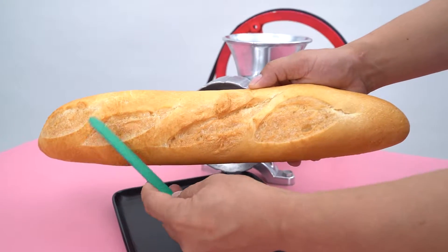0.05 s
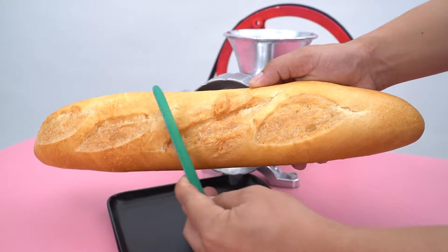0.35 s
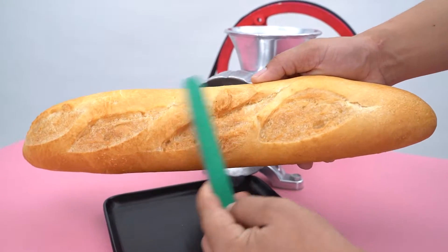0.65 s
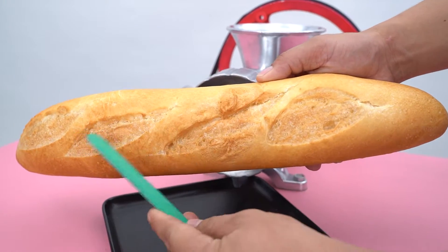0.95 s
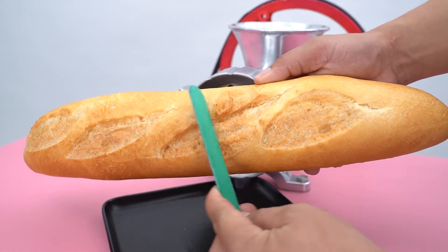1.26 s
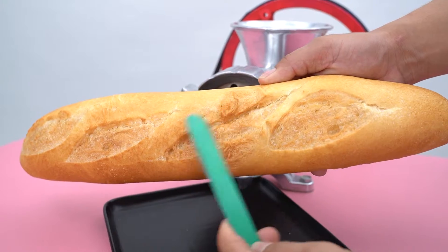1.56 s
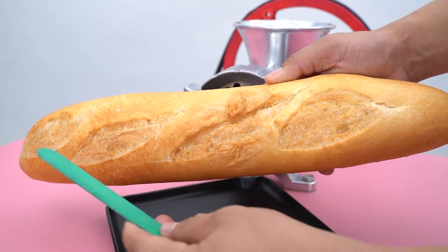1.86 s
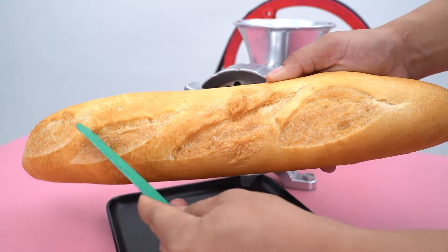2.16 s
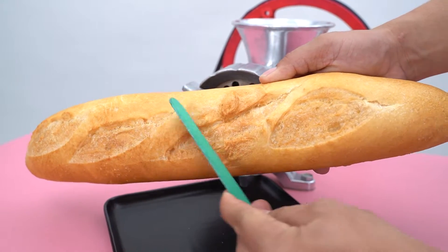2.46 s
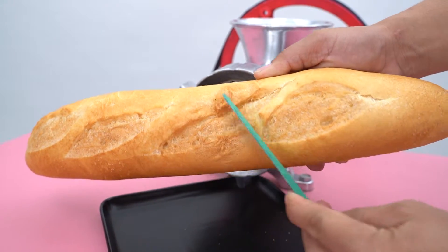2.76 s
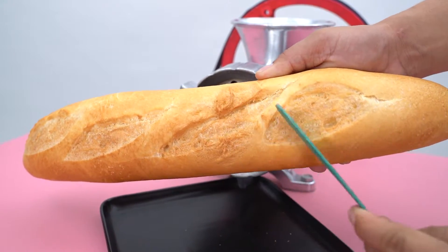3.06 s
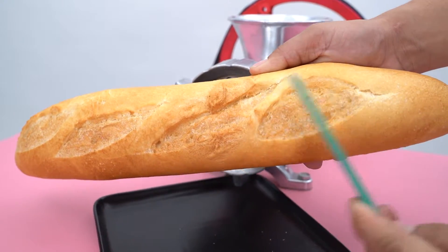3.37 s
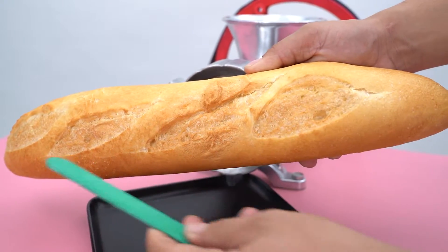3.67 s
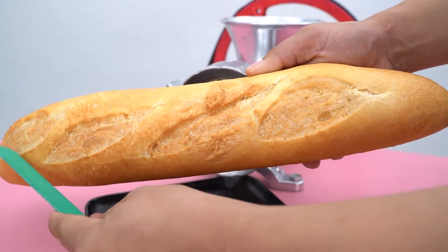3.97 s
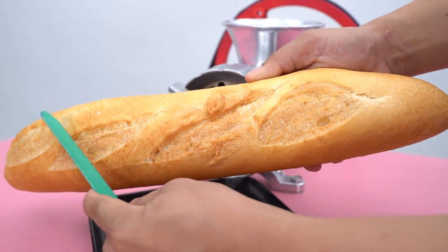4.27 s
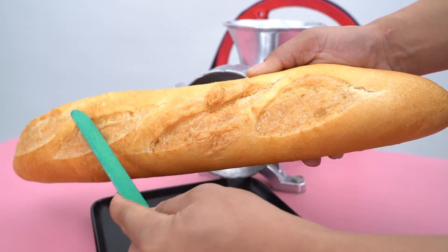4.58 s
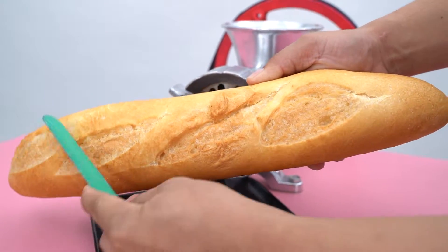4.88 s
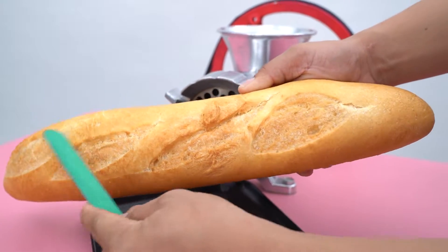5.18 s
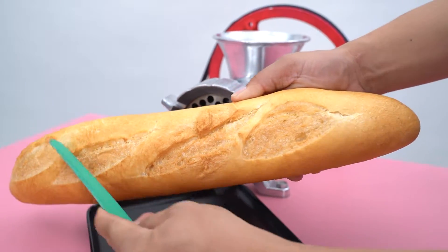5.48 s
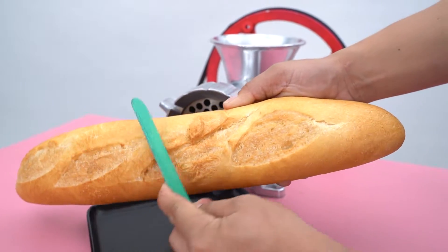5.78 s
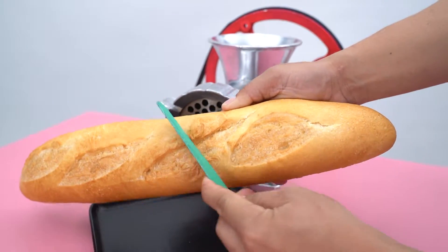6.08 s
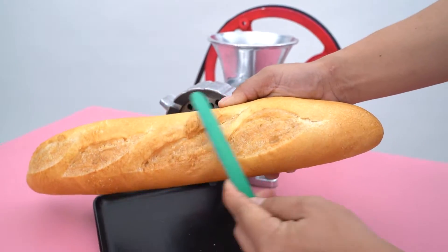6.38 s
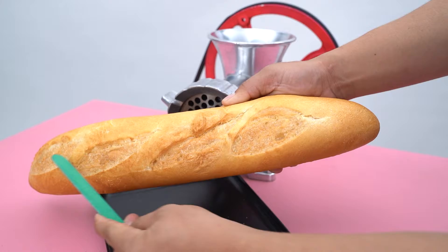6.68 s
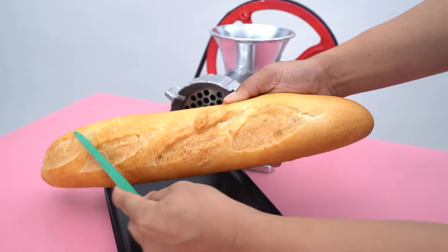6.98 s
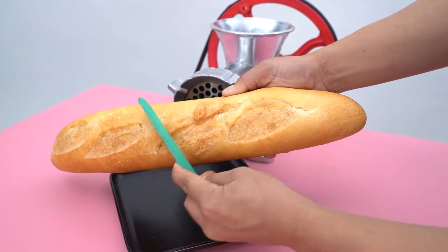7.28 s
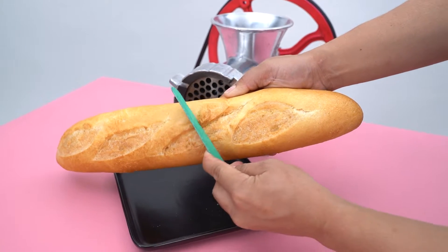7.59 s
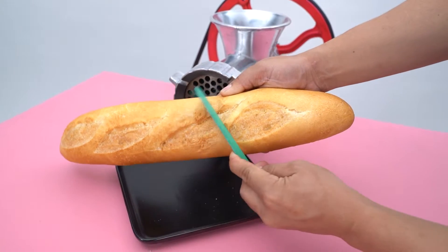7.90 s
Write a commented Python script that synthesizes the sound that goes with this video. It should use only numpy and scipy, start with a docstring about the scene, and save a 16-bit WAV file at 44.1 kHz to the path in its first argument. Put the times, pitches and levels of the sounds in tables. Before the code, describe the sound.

A plastic knife scrapes and picks at a crusty baguette, making dry rasps and sharp crunches in a bare, echoing room.

```python
"""Sharp crunches and a dry rasp: a plastic knife picks at a crusty baguette near a stereo microphone.
Each crunch is brittle fracture, a burst of tiny breaks that thump the loaf, ring a flake of crust
and shed fine splinters. Between crunches, stick-slip friction of the edge excites blade and crust.
The bare room answers with a bright reverberant tail over quiet air noise."""
import sys
import numpy as np
from scipy import signal
from scipy.fft import rfft, irfft
from scipy.io import wavfile
from scipy.ndimage import map_coordinates

SR = 44100
rng = np.random.default_rng(int(sys.argv[2]) if len(sys.argv) > 2 else 0)


def waveform_to_disk(signal):
    """Save audio, clipped to [-1, 1], as 16-bit WAV at the path in sys.argv[1]."""
    frames = np.transpose(np.atleast_2d(signal))
    scaled = np.clip(frames, -1, 1) * 32767
    samples = np.round(scaled).astype(np.int16)
    wavfile.write(sys.argv[1], SR, samples)


N = 358974
TIME = np.arange(N) / SR


def undb(db):
    """Amplitude ratio of a level in decibels."""
    return 10 ** (np.asarray(db) / 20)


def unit(x):
    """Normalisation to rms 1."""
    return x / np.sqrt(np.mean(x ** 2) + 1e-30)


def freqs(size):
    """Frequencies of a real spectrum, kept above zero."""
    return np.maximum(np.arange(size // 2 + 1) * SR / size, 1)


def along(f, table, column=1):
    """Interpolation of a table column over log frequency."""
    table = np.array(table, float)
    return np.interp(np.log(f), np.log(table[:, 0]), table[:, column])


def minimum_phase(gain):
    """Causality: folding the cepstrum gives the minimum-phase response of this magnitude."""
    cepstrum = irfft(np.log(gain + 1e-9))
    half = len(cepstrum) // 2
    cepstrum[1:half] *= 2
    cepstrum[half + 1:] = 0
    return np.exp(rfft(cepstrum))


def resonance(f, hz, width_hz):
    """Response of a damped oscillator, gain 1 at its centre."""
    return 1 / (1 + 1j * (f / hz - hz / f) * hz / width_hz)


def wander(knots_per_s):
    """Interpolated random fluctuation with a spread near 1."""
    knots = rng.standard_normal(N // 20)
    return 1.24 * np.interp(TIME * knots_per_s, np.arange(len(knots)), knots)


def add(track, sound, start):
    """Superposition of a sound on a track from a given sample."""
    part = sound[:max(len(track) - start, 0)]
    track[start:start + len(part)] += part


def pan(db):
    """Intensity stereo: the two gains for a left-minus-right level."""
    return undb(np.array([[1], [-1]]) * db / 2)


def stereo_noise(size, coherence):
    """Partial coherence: two noise spectra share a mid part and oppose a side part."""
    mid, side = rfft(rng.standard_normal((2, size)))
    mid, side = mid * np.sqrt(1 + coherence), side * np.sqrt(1 - coherence)
    return np.array([mid + side, mid - side]) / np.sqrt(2)


# Spectrum of still room air: frequency_hz, relative_density_db
AIR_SPECTRUM = [(15, -40), (25, -13), (84, -5), (130, -10.5), (212, -8.5), (384, -15), (516, -14),
                (641, -19.5), (840, -19), (4140, -39.5), (11900, -41), (16000, -42.5)]


def air(level_db=-55, coherence=.17, drone_hz=535, drone_width_hz=22, drone_db=4):
    """Ambient noise floor, in which a narrow resonance raises a faint drone."""
    f = freqs(N)
    drone = undb(drone_db) * resonance(f, drone_hz, drone_width_hz)
    colour = undb(along(f, AIR_SPECTRUM)) * (1 + drone)
    return unit(irfft(stereo_noise(N, coherence) * colour, N)) * undb(level_db)


# Bands of the room's tail: frequency_hz, level_db, t60_s, left_right_coherence
REVERB_BANDS = [(100, -4.5, 1, 0.78), (300, -7, 0.71, .8), (800, -5, 0.77, 0.67), (2500, -8, 0.75, 0.59),
                (6000, -8.5, 0.7, .1), (10000, -7, 0.54, 0), (16000, -6, 0.22, 0.092)]
# Narrow resonances of the room and table: frequency_hz, width_hz, gain_db
NARROW_MODES = [(238, 6.9, 7.5), (424.7, 11, 1.5), (542, 5, -26), (1260, 3.4, -2.5), (3200, 37, -22)]


def reverberation(x, size=SR, gap_s=.00096, build_s=.0075, early_db=-3.5, early_s=.019):
    """A diffuse field builds within milliseconds and decays exponentially, sooner in the treble."""
    f, t = freqs(size), TIME[:size]
    noise = stereo_noise(size, along(f, REVERB_BANDS, column=3)) * undb(along(f, REVERB_BANDS))
    onset = np.clip((t - gap_s) / build_s, 0, 1) * (1 + undb(early_db) * np.exp(-t / early_s))
    tail = 0
    for hz, _, t60_s, _ in REVERB_BANDS:
        band = along(f, [(row[0], row[0] == hz) for row in REVERB_BANDS])  # triangular crossover
        decay = onset * np.exp(-np.log(1000) * t / t60_s)
        tail = tail + irfft(noise * band, size) * decay / np.sqrt(np.sum(decay ** 2))
    modes = 1 + sum(undb(db) * resonance(f, hz, width_hz) for hz, width_hz, db in NARROW_MODES)
    impulse_response = irfft(rfft(tail) * modes, size)
    return signal.fftconvolve(x[None], impulse_response, axes=1)[:, :N]


# The knife's place on the loaf: time_s, left_minus_right_db, loaf_resonance_hz, thin_end_nearness (0-1)
KNIFE_PATH = [(.5, -2.5, 410, .1), (1.3, -2, 354, .1), (2.2, -3, 440, 0.75), (2.65, -1.8, 360.2, 0),
              (3.2, -1, 500, 0.33), (4.25, -4, 496, 0.9), (4.6, -4.5, 400, 0.82), (5.45, -3, 404, 0.96),
              (5.75, -3, 370, 0.02), (6.25, -1.3, 506.2, 0.15), (6.95, -4.5, 472.5, 1), (7.4, -2, 507, .2)]


def contact_point(time_s):
    """The point of excitation sets the stereo balance, the loaf's resonance and its thinness."""
    times, *columns = np.array(KNIFE_PATH, float).T
    return [np.interp(time_s, times, column) for column in columns]


# Response of the capsule pair: frequency_hz, right_lag_rad, left_minus_right_db
CAPSULES = [(98, .03, -2), (1960, 0.4, 2), (3600, 0.7, -1.5), (5010, 2.09, 2.5), (6050, 0.99, 2.5),
            (8950, 2.16, 1), (11480, 1.67, 0.5), (14100, 2.2, -3.5)]


def direct_path(x, echo_s=.0148, echo_db=-20):
    """Direct sound and one near-wall reflection reach the capsules with unequal phase and level."""
    f = freqs(N)
    phase = np.exp(.5j * along(f, CAPSULES) * np.array([[1], [-1]]))
    capsules = phase * pan(along(f, CAPSULES, column=2))
    comb = 1 + undb(echo_db) * np.exp(-2j * np.pi * f * echo_s)
    balance_db, _, _ = contact_point(TIME)
    return irfft(rfft(x) * comb * capsules, N) * pan(balance_db)


def handling(peak_s=6.83, level_db=-45.5, rise_s=.068, fall_s=.11, hz=90, width_hz=32):
    """Friction of the loaf turning in the hand: one swell of low narrow-band noise."""
    rumble = unit(irfft(rfft(rng.standard_normal(N)) * resonance(freqs(N), hz, width_hz) ** 2, N))
    t = TIME - peak_s
    return rumble * undb(level_db) * np.exp(np.minimum(t / rise_s, -t / fall_s))


# Faint tones after a flick of the blade: start_s, pitch_hz, level_db, t60_s
FLICK_TONES = [(2.919, 1071, -40, 0.73), (2.92, 1117, -43, .7)]


def flick_ring(waver_rad=.5):
    """Free decay: two close, wavering tones beat as they die away."""
    out, t = np.zeros(N), TIME[:SR]
    for start_s, pitch_hz, level_db, t60_s in FLICK_TONES:
        phase = 2 * np.pi * pitch_hz * t + waver_rad * wander(50)[:SR]
        decay = np.exp(-np.log(1000) * t / t60_s)
        add(out, undb(level_db) * np.sin(phase) * decay, int(start_s * SR))
    return out


def loaf_radiation(f, time_s, middle_hz=59.6, thin_end_hz=280):
    """A small body radiates little bass: a high-pass whose cutoff rises towards the thin end."""
    _, _, thinness = contact_point(time_s)
    ratio = 1j * f / (middle_hz + (thin_end_hz - middle_hz) * thinness)
    return ratio ** 2 / (1 + np.sqrt(2) * ratio + ratio ** 2)


# Spectrum of breaking crust: frequency_hz, relative_density_db
CRUST_SPECTRUM = [(60, -21.5), (150, 1.5), (400, -2), (900, 0.5), (1500, -0.5), (2400, -0.5), (3300, -0.5),
                  (4100, -2.5), (5200, 0.5), (7200, -5), (8600, -9.5), (10500, -9), (13000, -17.5),
                  (16000, -25)]


def crust_bands(size, low_hz=700, high_hz=4000, order=3.237):
    """Smaller parts radiate higher: the spectrum divides among loaf, flakes and splinters."""
    f = freqs(size)
    colour = undb(along(f, CRUST_SPECTRUM))
    low = 1 / (1 + (f / low_hz) ** (2 * order))
    high = 1 / (1 + (high_hz / f) ** (2 * order))
    return [minimum_phase(colour * np.sqrt(share)) for share in (low, (1 - low) * (1 - high), high)]


def blade(f, freedom, round_trip_hz=1335, reflection=.58):
    """Bending waves return from the blade's tip as standing waves; freedom is 1 sliding, 0 pinned."""
    return 1 / (1 - freedom * reflection * np.exp(-2j * np.pi * f / round_trip_hz))


# Strokes of the edge over the crust: start_s, end_s, level_db, roughness (0 sliding, 1 catching)
EDGE_STROKES = [(0.117, 0.193, -43.5, .1), (0.198, 0.379, -42, 0), (0.386, 0.54, -39.5, 0.26),
                (1.075, 1.144, -35, 0.54), (1.162, 1.274, -39, .55), (1.297, 1.377, -39, 0.75),
                (2.13, 2.199, -46, 0.55), (2.26, 2.42, -37, .4), (2.419, 2.544, -39, 0.51),
                (3.161, 3.318, -39, .25), (4.15, 4.2, -36, .7), (4.892, 4.965, -37, 0.4),
                (5.384, 5.479, -44, 0.5), (5.771, 5.894, -35.5, 0.37), (5.922, 6.054, -43, 0.73),
                (6.808, 6.89, -49, 0.52), (6.9, 7.006, -39.5, 0.7), (7.235, 7.297, -33.5, 0.54)]


def rasp(gain_db=-3.5, blister_db=5, catch_db=13, edge_s=.0036, sag=.048, wobble=.034, size=16384):
    """Stick-slip friction: a smooth slide sings in the blade, a rough one catches and crackles."""
    f, out = freqs(size), np.zeros(N)
    friction = rng.standard_normal(N)
    blisters = np.minimum(rng.exponential(size=N), 4)
    catching, pressure, grip = wander(220), wander(70), wander(40)
    loaf, flake, splinter = crust_bands(size)
    hollow = loaf * (.41 + resonance(f, 410, 110) + .5 * resonance(f, 710, 250))
    for start_s, end_s, level_db, roughness in EDGE_STROKES:
        span = slice(int(start_s * SR), int(end_s * SR))
        t = TIME[span]
        contact = np.clip(np.minimum(t - start_s, end_s - t) / edge_s, 0, 1) * undb(2 * pressure[span])
        snags = undb(roughness * (blister_db * blisters[span] + catch_db * catching[span]))
        force = rfft(friction[span] * contact * snags, size)
        singing = blade(f, freedom=1 - roughness / 4)  # digging in damps the blade
        # a smoother slide hisses higher and louder
        tilt_db_per_octave, hiss_db = 3.5 * (.5 - roughness), 7 - 12 * roughness
        hiss = splinter * undb(tilt_db_per_octave * np.log2(f))
        voices = [(hollow * loaf_radiation(f, start_s), -3),
                  (flake * singing, 0),
                  (hiss * singing, hiss_db)]
        sound = sum(unit(irfft(force * response)) * undb(level_db + db) for response, db in voices)
        # the resonances waver and sink as the contact moves along the blade
        glide = np.clip(1 - 2 * np.arange(size) / len(t), -1, 1)
        speed = 1 + sag * glide + wobble * grip[span.start:span.start + size]
        sound = map_coordinates(sound, [np.cumsum(speed)], order=5)
        add(out, sound * np.sqrt(len(t) / size) * undb(gain_db), span.start)
    return out


def crumb_events(max_count=12, full_rough_per_s=90, typical_ms=4, typical_hz=3000, scatter_db=1.9):
    """A jittered impulse train: rows of small crunches along each stroke, denser with roughness."""
    rows = []
    thump_db = splinter_db = -3
    for start_s, end_s, level_db, roughness in EDGE_STROKES:
        jitter = rng.random(max_count)
        deviations = np.clip(rng.standard_normal((max_count, 3)), -2, 2)
        times = start_s + (np.arange(max_count) + jitter) / (full_rough_per_s * max(roughness, .05))
        rows += [(time_s, typical_ms * 2 ** (length / 2), level_db + scatter_db * force,
                  typical_hz * np.exp(.45 * pitch), thump_db, splinter_db)
                 for time_s, (length, force, pitch) in zip(times, deviations) if time_s < end_s]
    return rows


def fractures(length_ms, size, count=64, scatter_db=5, spread=.4, taper=.2):
    """Crack growth: the spectrum of a burst of tiny breaks that swells quickly and ends more slowly."""
    timing, strength, polarity = rng.standard_normal((count, 3)).T
    offset = np.minimum(9 * np.expm1(np.maximum(1.15 * timing, -2.9) / 7), 4)  # skewed late
    force = np.sign(polarity) * undb(scatter_db * np.clip(strength, -2, 2))
    force *= np.exp(-np.abs(offset) * taper)
    samples = np.clip(size // 4 + offset * spread * length_ms * SR / 1000, 0, size - 1).astype(int)
    return rfft(np.bincount(samples, force / np.linalg.norm(force), size))


# Prominent cracks in the crust: peak_s, length_ms, level_db, flake_hz, thump_db, splinter_db
# level_db is the flake's level over 10 ms; thump and splinters are relative to it.
CRUST_CRACKS = [(.1004, 2.8, -38, 884, -7, -11), (.3918, 4.9, -33.5, 800, -6.5, 2),
                (.4696, 8.3, -27.5, 800, -4, -5), (.511, 3.9, -25.5, 890, -6, -3),
                (.5647, 1.7, -24, 765, -18, 1.5), (.5722, 4, -22, 3500, -12.5, 0.5),
                (.6133, 5.9, -28, 2680, -2, -6), (1.0746, 4.7, -40, 810, 5.5, 3),
                (1.1198, 4.7, -31.5, 3610, -3, -5), (1.1315, 5.7, -28, 3540, -9, -6),
                (1.2581, 9.1, -30, 3382, -2, -7), (1.3106, 3.7, -27.5, 1740, -2.5, -5),
                (1.3267, 3.9, -28.5, 980, 2, -11), (1.391, 1.8, -23.5, 3160, -7, -2.5),
                (1.4148, 1.96, -30, 1840, -5, -2), (1.5222, 1.8, -33.5, 3600, -3.5, -3),
                (1.5344, 2.2, -33.5, 1400, -2.5, -4), (1.6301, 3, -38, 3800, -12, 0),
                (2.1226, 3.1, -38.5, 1350, 1.5, -14), (2.1724, 7.8, -34, 2500, -2, -3),
                (2.2641, 4.5, -25.5, 1802, -1.5, -4), (2.2738, 5.3, -25.5, 2620, -2.5, 1.5),
                (2.3043, 4.9, -29, 3600, -3.5, -2), (2.3314, 0.35, -26, 3640, -14, -2),
                (2.34, 7.2, -26.5, 3590, -4, 1.5), (2.3696, 0.7, -27.5, 3600, -8.5, -4.5),
                (2.5742, 3.6, -23, 991, -3.5, -8), (2.5844, 7.2, -28.5, 2266, 1, -9),
                (2.6194, 4, -28.5, 1420, -3, -8), (2.6839, 2.5, -18, 920, -8.5, -9),
                (2.8025, 2.1, -20, 3760, -15, -2), (2.8165, 2.3, -26, 815, -5.5, 1),
                (2.9194, 2.3, -23, 1053, -6.5, -1), (3.1406, 2.7, -22.5, 3334, -13.5, 1),
                (3.1468, 6.7, -25, 2144, -7.5, 2), (3.2025, 2.2, -29, 1740, 1.5, 0),
                (4.0856, 3.5, -45, 810, -1.5, -5), (4.125, 3, -33.5, 2522, -5, -4),
                (4.1495, 1.7, -26, 1910, -14.5, -1.5), (4.171, 6.2, -27.5, 2530, -8.5, -12),
                (4.1916, 3.5, -34.5, 2660, 3, 4), (4.2715, 3, -21.5, 2374, -10, -2),
                (4.306, 4.8, -21, 2390, -9.5, -4), (4.5987, 4.8, -17, 2270, -4.5, 0),
                (4.866, 2.8, -48, 836, 3, -8), (4.9103, 4.8, -36, 1860, -4, -6),
                (4.924, 2.1, -26, 4000, -14, -3), (4.952, 5.9, -26, 2680, -4, -3.5),
                (5.1132, .76, -28.5, 3695, -5, -3), (5.1184, 2.4, -17.5, 1740, -4.5, -5),
                (5.1467, 2.9, -29, 3740, -4, -6), (5.2221, 4.4, -32, 3130, -15, -8),
                (5.4187, 5.1, -34.5, 870, -4, -6), (5.4435, 4.6, -27.5, 1298, -4, 2),
                (5.4679, 2.8, -31, 2454, -10, -4), (5.6393, 3.5, -16, 1910, -4.5, -1),
                (5.6657, 3.4, -21.5, 2510, -9, -2.5), (5.7316, .98, -20.5, 3370, -11.5, -4.5),
                (5.7589, 3.7, -11.5, 1288, -8, -1), (5.8562, 3.3, -25.5, 930, -6, 0),
                (5.941, 3.4, -22, 2993, 1, -5), (5.9531, 4.9, -30.5, 980, 7, -6),
                (5.9617, 1, -30.5, 820, 0, 2), (6.0387, 5.1, -25.5, 3176, -4, 0),
                (6.2077, 2.2, -14.5, 2860, -7.5, -5.5), (6.2531, 5, -18.5, 2710, -2.5, -1),
                (6.2929, 3.4, -21, 2900, -0.5, -2), (6.3518, 1.4, -16.5, 3270, -30, -6),
                (6.3566, 4.4, -20.5, 2834, -13.5, 4), (6.908, 3.7, -29, 2430, -1, -2.5),
                (6.9445, 4.3, -30.5, 2490, -8, -2), (6.979, 4.5, -23.5, 2470, -5, -2),
                (7.1386, 3.7, -14, 3520, -6.5, -2), (7.1672, 2.1, -19, 1852, -17, 1.5),
                (7.2174, .9, -16, 3445, -21, -3), (7.2252, 4.3, -14, 855, -12, 2),
                (7.3397, 3.8, -23, 879, -6.5, -6), (7.384, 3.5, -21, 3310, -3.5, -1.5),
                (7.4489, 4, -20, 1210, -2, -0.5), (7.622, 3.5, -19, 3090, -2, -0.5),
                (7.6501, 1.4, -17.5, 3020, -6, -4), (7.758, 2, -19, 2360, -2, -5.5),
                (7.8168, 3.4, -23, 2930, -6, -0.5), (7.9721, 2, -13, 3200, -12.5, -1.5),
                (8.0554, .72, -34.5, 3030, -33, 3)]


def crunches(events, size=4096, loaf_q=1.68, loaf_thud=.33, flake_q=4.5, flake_ring=1.43, give=.73):
    """Brittle fracture: each burst drives a flake and splinters, and jolts the loaf as the crust yields."""
    f, out = freqs(size), np.zeros(N)
    loaf, flake, splinter = crust_bands(size)
    jolt = give * np.exp(-2j * np.pi * f * (size // 4) / SR)  # one push at the height of the burst
    for peak_s, length_ms, level_db, flake_hz, thump_db, splinter_db in events:
        burst = fractures(length_ms, size)
        _, loaf_hz, _ = contact_point(peak_s)
        loaf_mode = loaf_thud + resonance(f, loaf_hz, loaf_hz / loaf_q)
        flake_mode = 1 + flake_ring * resonance(f, flake_hz, flake_hz / flake_q)
        voices = [((burst + jolt) * loaf * loaf_radiation(f, peak_s) * loaf_mode, thump_db),
                  (burst * flake * flake_mode, 0),
                  (burst * splinter, splinter_db)]
        sound = sum(unit(irfft(spectrum)) * undb(level_db + db) for spectrum, db in voices)
        add(out, sound * np.sqrt(.01 * SR / size), int(peak_s * SR) - size // 4)
    return out


def scene(shared_power=.7):
    """Direct plus diffuse field; by directivity, a crack sends a partly different burst to the walls."""
    scraping = rasp() + flick_ring() + handling()
    off_axis, on_axis = crunches(CRUST_CRACKS), crunches(CRUST_CRACKS)
    background = air()
    scraping += crunches(crumb_events())
    close = on_axis + scraping
    walls = np.sqrt(shared_power) * reverberation(close)
    walls += np.sqrt(1 - shared_power) * reverberation(off_axis + scraping)
    return background + walls + direct_path(close)


def record(dry, cutoff_hz=15900):
    """Saturation and band limiting: peaks clip at full scale, then a steep low-pass cuts the top."""
    lowpass = signal.ellip(10, .2, 70, cutoff_hz, fs=SR, output="sos")
    return signal.sosfilt(lowpass, np.clip(dry, -1, 1))


dry = scene()
out = record(dry)
waveform_to_disk(out)
```